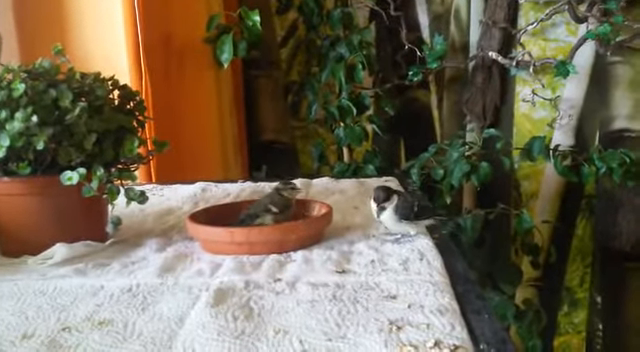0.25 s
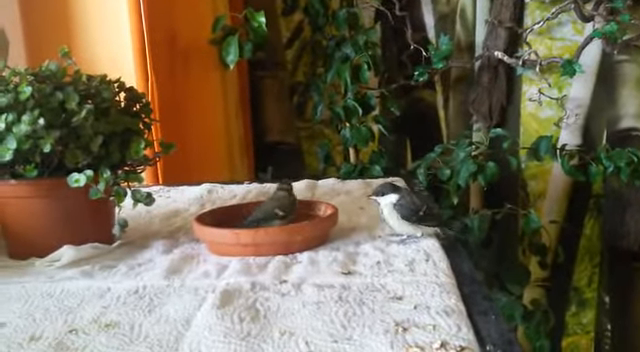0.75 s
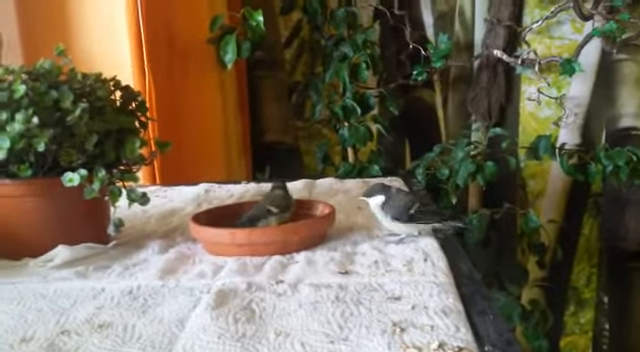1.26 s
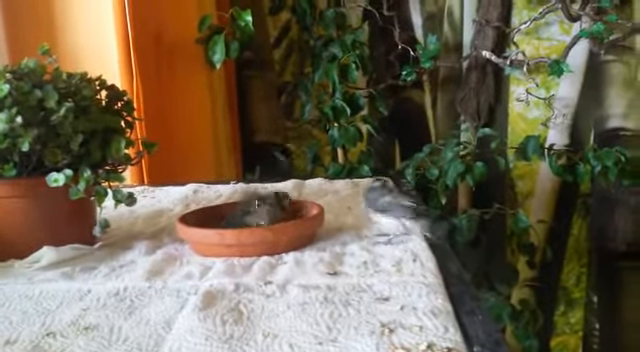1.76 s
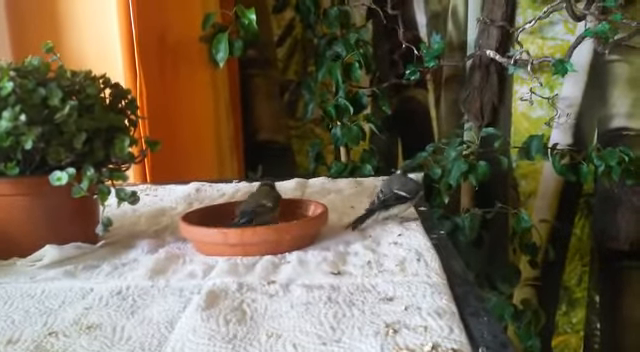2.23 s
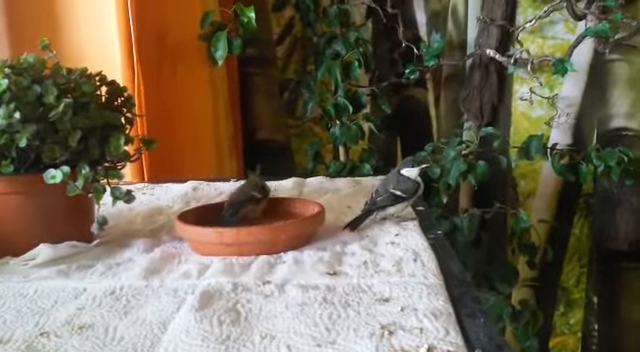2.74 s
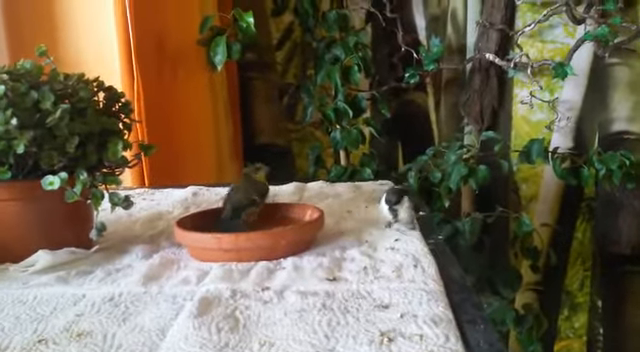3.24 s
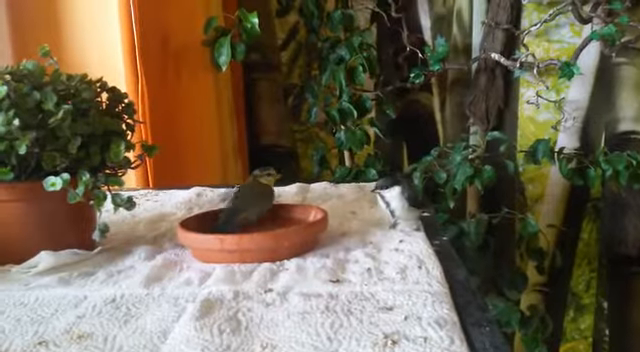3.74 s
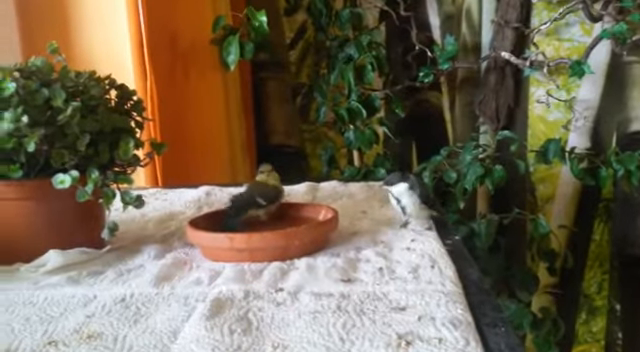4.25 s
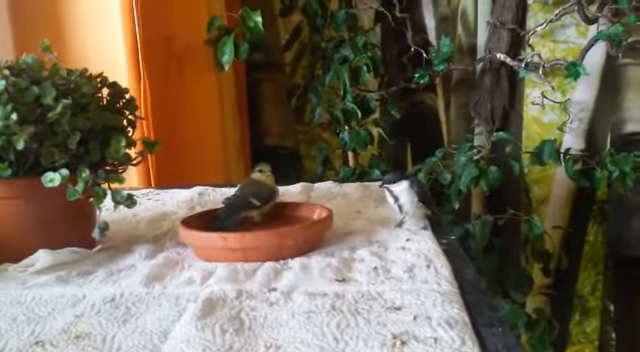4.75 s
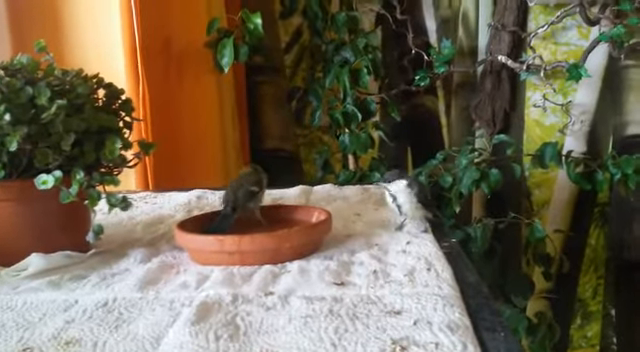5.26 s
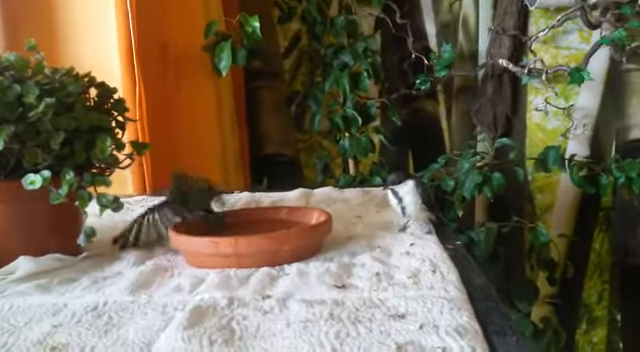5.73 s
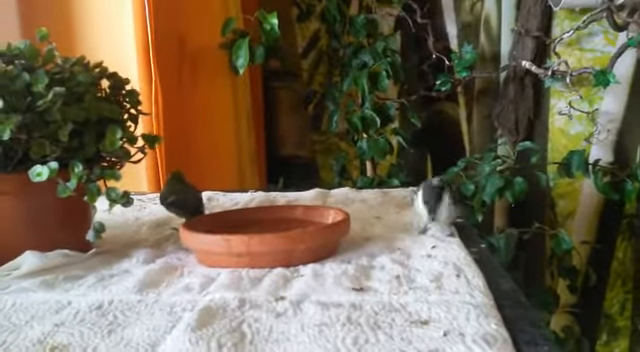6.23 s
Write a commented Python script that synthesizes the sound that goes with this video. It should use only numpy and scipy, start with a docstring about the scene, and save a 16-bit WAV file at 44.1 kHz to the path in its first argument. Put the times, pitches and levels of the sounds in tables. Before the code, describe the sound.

Faint splashes and feather rustle open the scene, then four rapid buzzy chirps, each longer than the last. Quiet water flicks and scrapes follow, then a crisp beak peck on a clay dish. Two more four-chirp begging runs come later, separated by a quieter gap with a soft low bump. Small-room reverberation surrounds the calls; low, airy background noise swells around them. One mono microphone, fairly close.

```python
"""A young tit begs in three runs of four chirps: two syrinx whistles share a flutter that makes them buzz.
A second bird splashes and shakes its feathers in a clay dish: decaying noise bursts and grainy hiss.
Beak pecks ring the modes of the dish; low tones thump softly, and one spell of low band noise whirs.
The steady background noise of the small room swells in spells, most of all during the begging."""
import sys
import numpy as np
from scipy import signal
from scipy.fft import rfft, irfft, next_fast_len
from scipy.io import wavfile
from scipy.ndimage import map_coordinates

SR = 44100
rng = np.random.default_rng(int(sys.argv[2]) if len(sys.argv) > 2 else 0)


def unload_wav(signal):
    """Save mono or channel-first audio to the path in sys.argv[1] as 16-bit WAV at rate SR, clipped to [-1, 1]."""
    wavfile.write(
        sys.argv[1],
        SR,
        np.round(np.clip(np.atleast_2d(signal).T, -1, 1) * 32767).astype(np.int16),
    )


N = 286191  # length [samples]

# Chirps, four to a run: (time [s], length to half gate [s], lower arch [Hz],
# upper relative level [dB], lower relative level [dB], upper swell rate [dB per chirp length])
CHIRPS = [ (0.912, 0.063, -58, -41.5, -44.5, -8), (1.032, 0.076, 156, -36.3, -41, 1),
          (1.185, 0.095, 361, -35, -37.5, 7.5), (1.394, 0.13, 402, -39, -36.5, 9),
          (3.792, 0.0558, -40, -49, -45.5, -10), (3.92, 0.082, 43, -41, -42, -8),
          (4.082, 0.104, 258, -36.5, -38.5, 1), (4.288, 0.106, 340.5, -37, -39, 7),
          (5.633, 0.0573, -70, -44.5, -44, -4.5), (5.764, 0.073, 132, -43, -39, -2),
          (5.933, 0.12, 158, -35, -36.5, 12.5), (6.169, 0.12, 672, -35.5, -35, 31)]
# The four pitches through which every run passes: (upper held [Hz], upper arch [Hz], lower held [Hz])
RUN_PITCHES = [(6329, 236, 3580), (6580, 1000, 3645), (6534, 1400, 3642), (6520, 1400, 3646)]
# Colour of the breath noise in a chirp: (frequency [Hz], relative density [dB])
RASP_COLOUR = [(2400, -47), (3000, -7), (3700, -4.5), (4500, -1.5), (5200, 1.5), (5700, -1), (6700, 9),
               (7700, -8), (8400, -29), (10000, -10), (11500, -39), (14000, -52.5)]
# Splashes and claw scrapes: (time [s], relative level [dB], low slap against spray [dB])
SPLASHES = [(0.0117, -54, -11), (0.0274, -56, -2), (0.2027, -55, -13), (0.2535, -59, -26),
            (0.4362, -54.5, -19), (0.4657, -52.5, -17), (0.5214, -51, -6), (0.5872, -53, -21.5),
            (1.5629, -46, -12.5), (1.7078, -50.5, -25), (1.714, -46, -14), (1.7659, -54.5, -19.5),
            (1.836, -49.5, -21), (1.991, -53.5, 3), (2.0577, -52.5, -4), (2.3078, -53.3, -5),
            (2.3156, -52.5, -6), (2.4159, -57, -10), (3.2858, -53, -8), (5.176, -53, -25),
            (5.6852, -46.5, -28)]
# Beak on the dish: (time [s], relative level [dB], ring pitch ratio [1])
PECKS = [(1.8357, -43, .88), (2.7805, -49, 1.47), (2.8074, -30.5, 1)]
# Modes of the dish at pitch ratio 1: (frequency [Hz], relative level [dB], T60 [s])
DISH_MODES = [(4250, -7, .02), (4690, 1, .022), (4900, -3, .016), (5350, -8, .014), (6850, -13, .026)]
# Shakes of wet feathers: (start [s], end [s], rise [s], level [dB])
SHAKES = [(0.139, 0.334, 0.114, -70), (0.314, 0.543, 0.048, -63), (0.731, 0.842, 0.084, -56.5),
          (1.552, 1.84, 0.088, -70), (2.31, 2.479, 0.14, -67)]
# Colour of the feather rustle: (frequency [Hz], relative density [dB])
FEATHER_COLOUR = [(700, -7), (1500, -4.5), (2500, -2), (3800, -0.5), (5300, 6.5), (7000, -3.5),
                  (10000, -11.5), (14500, -15.5)]
# One spell of low, uneven whirring noise: (start [s], end [s], rise [s], level [dB])
WHIR = (0.93, 1.4, 0.02, -64.5)
# Wing beats and soft bumps: (time of peak [s], frequency [Hz], half width at 1/e [s], peak level [dB])
THUMPS = [(0.005, 185, 0.046, -62), (2.024, 420, 0.018, -63), (3.335, 215, 0.03, -61),
          (4.43, 66.8, 0.0236, -52.5), (5.749, 210, 0.02, -48), (5.97, 440, 0.018, -58)]
# Spells of louder background noise: (start [s], end [s], rise [s], rumble level [dB], air level [dB])
SWELLS = [(0, 0.614, 0.0045, -68.5, -69), (0.688, 1.25, 0.079, -67.5, -61.5),
          (0.97, 1.595, 0.095, -63.5, -61), (1.752, 1.83, 0.045, -65, -64.5),
          (1.962, 2.058, .03, -67, -69.5), (2.217, 2.516, 0.074, -75, -68),
          (3.27, 3.366, 0.032, -69.5, -73.5), (3.71, 4.433, 0.32, -63.5, -61),
          (5.613, 6.342, 0.089, -64, -61)]
# Colours of the background rumble and air: (frequency [Hz], relative density [dB])
RUMBLE_COLOUR = [(20, -1), (30, -28), (60, -1), (110, 1.5), (200, -2), (350, -6), (700, -17.5),
                 (1500, -61.5)]
AIR_COLOUR = [(80, -10), (200, 5.5), (380, 1.5), (600, 1), (1000, -1), (2000, -4.5), (4000, -6),
              (8000, -8.5), (12000, -9.5), (14500, -12.5)]
# Decay of the room: (frequency [Hz], T60 [s])
WALL_DECAY = [(200, 0.45), (3500, 0.3373), (6500, 0.29), (12000, 0.12)]

# Flutter of the syrinx: mean rate, relative drift, depth (0-1), and how much depth clears at the crest
FLUTTER_HZ, FLUTTER_DRIFT, BUZZ, CREST_CLEARING = 342, 0.025, 0.85, 0.36
# Pitch arch: time of the crest, half widths at 1/e of the upper and lower side
CREST_S, UPPER_ARCH_S, LOWER_ARCH_S = 0.027, 0.0115, 0.015
# Scoop: each side starts flat by this share of its held pitch and slides up
UPPER_SCOOP, LOWER_SCOOP, SCOOP_S = 0.085, 0.12, 0.01501
# Effort, on a clock that runs faster in short chirps: soft start, attacks, then tiring after the hold
SOFT_START_DB, UPPER_ATTACK_S, LOWER_ATTACK_S = -13.5, 0.058, 0.018
HOLD_S, TIRE_DB_PER_S = 0.06736, 155.5
ONSET_S = 0.011  # linear fade-in of the voice
SUM_TONE_DB, OCTAVE_DB = -26, -28  # product terms, against the two whistles
SPLASH_T60_S, SHAKE_T60_S, WHIR_T60_S, SWELL_T60_S = 0.0698, 0.36, 1.06, 0.65
RUMBLE_DB, AIR_DB = -72.5, -71.5  # the background outside its swells
TOP_HZ = 14650  # upper band limit


def chirps():
    """Nonlinear source: two arching whistles share a flutter; products and pulsed breath noise join them."""
    out = np.zeros(N)
    for k, (s, length, low_arch_hz, up_db, low_db, swell_db) in enumerate(CHIRPS):
        up_held, up_arch_hz, low_held = RUN_PITCHES[k % len(RUN_PITCHES)]
        t = np.arange(int((length + 0.068) * SR)) / SR

        up_arch = np.exp(-((t - CREST_S) / UPPER_ARCH_S) ** 2)
        low_arch = np.exp(-((t - CREST_S) / LOWER_ARCH_S) ** 2)
        scoop = np.exp(-(t / SCOOP_S) ** 2)
        up_pitch = up_held * (1 - UPPER_SCOOP * scoop) + up_arch * up_arch_hz
        low_pitch = low_held * (1 - LOWER_SCOOP * scoop) + low_arch * low_arch_hz

        buzz = BUZZ - CREST_CLEARING * up_arch
        flutter_hz = FLUTTER_HZ * (1 + FLUTTER_DRIFT * wobble(58.6, len(t)))
        flutter = 2 * np.pi * np.cumsum(flutter_hz) / SR
        upper = syrinx_side(up_pitch, buzz, flutter, swing_hz=350, throb=0.42, lag=0.6)
        lower = syrinx_side(low_pitch, buzz, flutter, swing_hz=280, throb=0.35, lag=1.0)

        pace = max(1, 0.073 / length)  # short chirps reach full effort sooner
        swell = swell_db * np.clip(t / length - 0.7, -0.4, 0.3)
        up_gain = amp(up_db + effort(pace * t, UPPER_ATTACK_S, full_db=-2.2) + swell)
        low_gain = amp(low_db + effort(pace * t, LOWER_ATTACK_S, full_db=-4.5))
        both = np.sqrt(up_gain * low_gain)

        overtones = amp(SUM_TONE_DB) * upper * lower + amp(OCTAVE_DB) * (upper ** 2 - 1)
        overtones = filtered(overtones, lambda hz: hz > 2800)  # the beak radiates no bass
        puffs = 1 + 0.52 * np.sin(flutter)  # air passes once a flutter
        rasp = amp(-3.5) * unit(puffs * noise(RASP_COLOUR, len(t)))
        gate = np.clip(t / ONSET_S, 0, 1) * np.clip((length - t) / 0.025 + 0.5, 0, 1)
        add(out, s, gate * (up_gain * upper + low_gain * lower + both * (overtones + rasp)))
    return out


def syrinx_side(pitch, buzz, flutter, swing_hz, throb, lag):
    """Joint frequency and amplitude modulation by the flutter splits one membrane's whistle into sidebands."""
    jitter = 52 * wobble(1100, len(pitch)) + 35 * wobble(70, len(pitch))
    hz = pitch + buzz * (swing_hz * np.sin(flutter) + jitter)
    strength = (1 + throb * buzz * np.sin(flutter + lag)) * amp(wobble(90.4, len(pitch)))
    return unit(strength * np.sin(2 * np.pi * np.cumsum(hz) / SR))


def effort(t, attack, full_db):
    """Driving effort sets the level [dB] of one side: a rise over the attack, and a fall after the hold."""
    softness = np.maximum(1 - t / attack, 0)
    return full_db + SOFT_START_DB * softness - TIRE_DB_PER_S * np.maximum(t - HOLD_S, 0)


def splashes():
    """Impulsive excitation: a flick of water or scrape of a claw is a spiky noise burst with decay."""
    out, t = np.zeros(N), np.arange(SR // 4) / SR
    for s, db, low_db in SPLASHES:
        spray = noise([(800, -5), (2000, -2), (4500, 1.5), (8000, -6.0), (14000, -13.5)], len(t))
        slap = noise([(200, 21), (700, 21), (1600, 12), (3000, -48)], len(t))
        grain = unit(amp(2.5 * wobble(1010, len(t))))
        decay = amp(db - 5 - 60 * t / SPLASH_T60_S)
        add(out, s, decay * grain * (spray + amp(low_db) * slap))
    return out


def feathers():
    """Many small frictions sum to noise: wet feathers rustle in spells, with fine droplets in the hiss."""
    level = sum(amp(db) * spell(start, end, rise, SHAKE_T60_S) for start, end, rise, db in SHAKES)
    grain = unit(amp(2.8 * wobble(1200, N) + 1.8 * wobble(70, N)))
    return level * grain * noise(FEATHER_COLOUR, N)


def pecks():
    """Modal ringing: the beak's crack is a noise burst, and the struck dish sounds its damped modes."""
    out, t = np.zeros(N), np.arange(SR // 6) / SR
    crack_colour = [(1500, -20), (3200, -14), (4900, 15), (6000, 3), (8000, -1), (14000, -12)]
    for s, db, ratio in PECKS:
        ring = np.zeros(len(t))
        for hz, level, t60 in DISH_MODES:
            phase = 2 * np.pi * (ratio * hz * t + rng.random())
            ring += amp(level - 60 * t / t60) * np.sin(phase)
        ring *= np.clip(t / 0.000483, 0, 1)  # the modes build up over a few cycles
        crack = amp(-60 * t / 0.007) * noise(crack_colour, len(t))
        add(out, s, amp(db) * (amp(-6) * ring + amp(-9) * crack))
    return out


def whir():
    """Amplitude-modulated band noise: a low whir in soft, uneven puffs that dies away slowly."""
    start, end, rise, db = WHIR
    puffs = spell(start, end, rise, WHIR_T60_S) * amp(db + wobble(30, N))
    return puffs * noise([(120, -32.0), (260, -10.5), (350, -3.0), (450, -18.5), (900, -24), (3000, -59)], N)


def thumps():
    """Pressure pulses: each soft push is a low tone of wandering phase under a Gaussian envelope."""
    out, t = np.zeros(N), np.arange(N) / SR
    for s, hz, half, db in THUMPS:
        envelope = amp(db) * np.exp(-((t - s) / half) ** 2)
        out += envelope * np.sin(2 * np.pi * hz * (t - s) + 1.53 * wobble(53, N))
    return out


def hush():
    """Incoherent noises add in power: the background rumble and air swell in spells above a steady level."""
    rumble_power, air_power = amp(RUMBLE_DB) ** 2, amp(AIR_DB) ** 2
    for start, end, rise, rumble_db, air_db in SWELLS:
        swell = spell(start, end, rise, SWELL_T60_S)
        rumble_power = rumble_power + (amp(rumble_db) * swell) ** 2
        air_power = air_power + (amp(air_db) * swell) ** 2
    return np.sqrt(rumble_power) * noise(RUMBLE_COLOUR, N) + np.sqrt(air_power) * noise(AIR_COLOUR, N)


def room(x, wet_db):
    """Reverberation by convolution: close walls answer with a tail that dies faster in the treble."""
    hz, t, z = signal.stft(rng.standard_normal(SR * 2 // 3), SR, nperseg=256)
    decay = amp(-60 * t / along(WALL_DECAY, hz)[:, None])
    tail = signal.istft(z * decay, SR, nperseg=256)[1]
    tail = np.pad(tail / np.linalg.norm(tail), (SR // 250, 0))  # 4 ms before the first echo
    return x + amp(wet_db) * signal.fftconvolve(x, tail)[:N]


def spell(start, end, rise, t60):
    """Linear build-up and exponential decay: gain rises from the start, holds until the end and dies away."""
    t = np.arange(N) / SR
    return np.clip((t - start) / rise, 0, 1) * amp(-60 * np.maximum(t - end, 0) / t60)


def amp(db):
    """The level law: decibels to amplitude gain."""
    return 10 ** (np.asarray(db) / 20)


def unit(x):
    """Normalisation to an effective (rms) value of 1."""
    return x / np.sqrt(np.mean(x ** 2) + 1e-20)


def along(points, hz):
    """Interpolation of (frequency [Hz], value) points on a logarithmic frequency axis."""
    f, v = np.transpose(points)
    return np.interp(np.log(hz + 1), np.log(f + 1), v)


def wobble(rate, size):
    """Band-limited randomness: a smooth random curve with rate knots a second."""
    knots = rng.standard_normal(int(size * rate / SR) + 4)
    return map_coordinates(knots, [np.arange(size) * rate / SR])


def filtered(x, response):
    """Linear filtering: the spectrum of x times a response of frequency."""
    m = next_fast_len(len(x) + 8192)  # padding against wrap-around
    return irfft(rfft(x, m) * response(np.fft.rfftfreq(m, 1 / SR)), m)[:len(x)]


def noise(spectrum, size):
    """Spectral shaping: white noise filtered to the given colour, at rms 1."""
    return unit(filtered(rng.standard_normal(size), lambda hz: amp(along(spectrum, hz))))


def add(track, s, sound):
    """Superposition: mix a sound into the track from time s [s]."""
    part = track[max(round(s * SR), 0):][:len(sound)]
    part += sound[:len(part)]


def scene():
    """Superposition of the birds in the room and the background hush, as one channel."""
    calls = amp(-3.0) * room(chirps(), wet_db=-1.0)
    bathing = room(splashes() + feathers(), wet_db=-11.5)
    dish = room(pecks(), wet_db=-10.5)
    return (calls + bathing + dish + whir() + thumps() + hush())[None]


def record(dry):
    """Band limitation: only frequencies below the upper limit pass."""
    return np.array([filtered(x, lambda hz: hz < TOP_HZ) for x in dry])


dry = scene()
out = record(dry)
unload_wav(out)
```